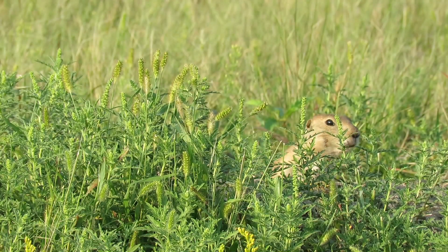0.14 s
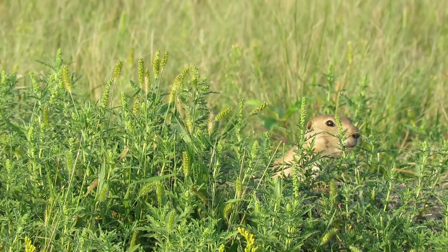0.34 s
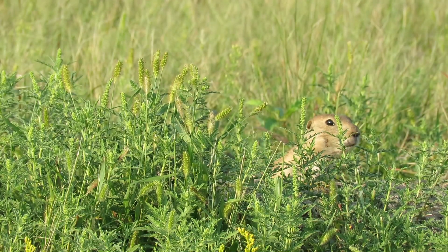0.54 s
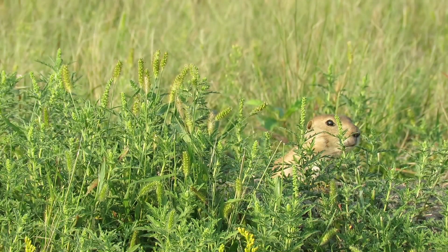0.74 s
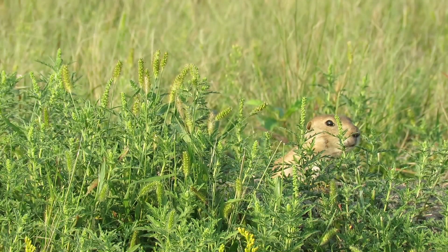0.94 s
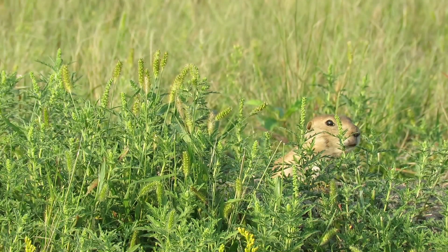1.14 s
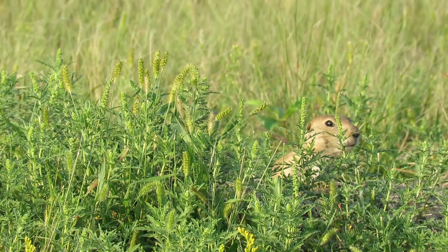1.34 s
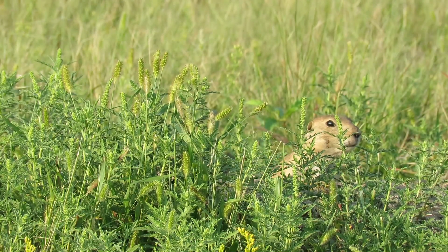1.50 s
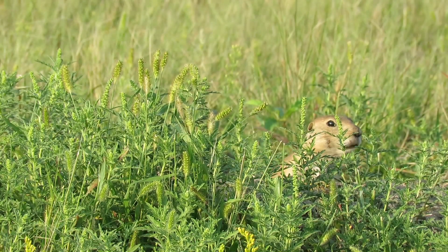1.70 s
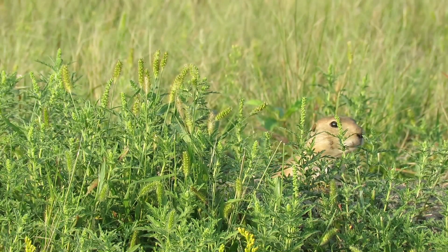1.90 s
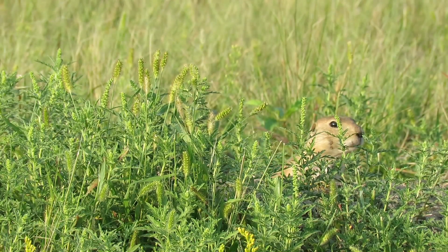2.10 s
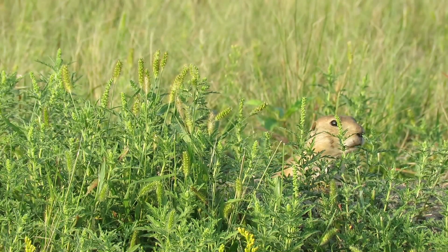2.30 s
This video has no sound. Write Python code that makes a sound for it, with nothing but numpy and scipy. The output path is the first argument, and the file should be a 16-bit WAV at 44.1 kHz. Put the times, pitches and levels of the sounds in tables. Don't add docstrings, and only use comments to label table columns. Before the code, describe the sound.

A prairie dog barks five times, short, high and slightly fluttering, at centre in a grassy field. Crickets chirp and trill around it, and light wind thumps the wide stereo microphone near the end.

```python
import sys
import numpy as np
from scipy import signal
from scipy.fft import rfft, irfft, next_fast_len
from scipy.io import wavfile
from scipy.ndimage import uniform_filter1d, map_coordinates

SR = 44100
rng = np.random.default_rng(int(sys.argv[2]) if len(sys.argv) > 2 else 0)


def put_to_file(sound):
    columns = np.atleast_2d(sound).T
    safe = np.clip(columns, -1, 1)
    whole_steps = np.round(safe * 32767)
    wavfile.write(sys.argv[1], SR, whole_steps.astype(np.int16))


def natural_amplitude(level_db):
    exponent = np.asarray(level_db, float) / 20
    return 10 ** exponent


N = 103635

# time_s, pitch_hz, effort_db, flutter_db (re tone)
BARK_CONTOURS = [
    [(.196, 1820, -59, -18), (.199, 1870, -41, -18), (.203, 2030, -43.5, 3), (.208, 2068, -41.5, -10),
     (.222, 2074, -40.5, -13), (.229, 2087, -46, -1), (.235, 1880, -44, 1), (.243, 1750, -46, -15),
     (.25, 1490, -63, -5)],
    [(.5625, 1775, -71, -24), (.565, 1827, -43, -9), (.573, 1988, -41, -9), (.581, 1985, -37.5, -8),
     (.59, 1958, -44.5, -6), (.6, 1890, -45, -4), (.607, 1786, -41, -14), (.611, 1610, -54, -10),
     (.616, 1410, -59, -12)],
    [(.963, 1740, -76, -10), (.966, 1831, -44, -26), (.974, 1897, -39, -15), (.983, 1907, -40.5, -8.5),
     (.992, 1885, -41, -9), (1.0005, 1846, -41.5, -17), (1.008, 1766, -42, -12), (1.012, 1590, -52, -6),
     (1.019, 1460, -58, -14)],
    [(1.2925, 1730, -56, 2), (1.295, 1714, -51.5, -5), (1.301, 1812, -43, -3.5), (1.308, 1893, -39.5, -25),
     (1.315, 1900, -40.5, -8), (1.324, 1852, -43, -13), (1.331, 1840, -42.5, -18),
     (1.336, 1640, -47.5, -12), (1.341, 1510, -78, -12)],
    [(1.8165, 1575, -57, 2), (1.821, 1623, -53.5, -4), (1.827, 1715, -47, -6), (1.833, 1712, -41.5, -10.5),
     (1.839, 1755, -39.5, -14), (1.848, 1756, -39.5, -21), (1.854, 1715, -42.5, -22),
     (1.857, 1550, -49, -12), (1.866, 1320, -65, -4)],
]
# start_hz, middle_hz, end_hz
FLUTTER_RATES = [(404, 420, 316), (442, 580, 290), (469, 300, 280), (360, 285, 240), (461, 350, 246)]
# freq_hz, gain_db
THROAT_GAIN = [(1450, 0), (1800, 0), (2400, -2), (3000, 10), (3560, 9), (3850, 9), (4150, 18),
               (4700, -16.5)]
# freq_hz, gain_db
MUZZLE_GAIN = [(4700, 1), (6000, 9), (7600, 3.5), (9500, 1), (11500, -4), (13000, -4), (14000, -15),
               (15200, -38)]

# onset_s, level_db, pitch_hz
NEAR_CHIRPS = [(0.0762, -41.5, 4840), (0.1204, -40.5, 4890), (0.1656, -39.5, 4900), (0.949, -38.5, 4840),
               (0.9946, -40, 4890), (1.4626, -38.5, 4833), (1.506, -37.5, 4880), (1.559, -38, 4910),
               (1.9635, -38, 4815), (2.0058, -37, 4880), (2.055, -36.5, 4910)]
# onset_s, level_db, pitch_hz
RIGHT_CHIRPS = [(0.3561, -46, 4760), (0.401, -48.5, 4670), (0.783, -53, 4700), (0.82, -50, 4640),
                (0.8614, -53, 4700), (1.2216, -51, 4740), (1.2644, -47.5, 4690), (1.6123, -49.5, 4720),
                (1.6657, -49.5, 4700), (2.1083, -44.5, 4700), (2.154, -47, 4700)]
# onset_s, level_db, pitch_hz
LOW_CHIRPS = [(1.075, -56, 4170), (1.122, -54.5, 4250), (1.41, -60, 4180), (1.455, -58, 4230),
              (1.91, -53, 4230), (2.222, -62, 4100), (2.265, -55.5, 4130), (2.315, -54, 4200)]
# onset_s, level_db, pitch_hz
CENTRE_CHIRPS = [(0.7944, -63, 5000), (0.836, -63, 5140), (1.1423, -61, 5000), (1.1844, -52, 4890),
                 (1.6444, -52, 4960), (1.6866, -57, 5000), (2.0344, -50, 4960), (2.0794, -60, 4970),
                 (2.1166, -57, 5000), (2.2443, -56, 5000), (2.2827, -59, 4970), (2.3306, -53.5, 4860)]
# start_s, period_s, stroke_count
TRILL_PHRASES = [
    (-.011, .0609, 21),
    (1.276, .06, 1),
    (1.455, .0578, 5),
    (1.748, .0593, 11),
]
# start_s, period_s, stroke_count
ANSWER_PHRASES = [
    (.024, .0587, 12),
    (1.059, .056, 5),
    (1.359, .0587, 16),
]
# centre_after_onset_s, length_s, start_pitch_drop_share, end_pitch_drop_share
FIELD_WING = (.006, .025, .01, .12)
TRILL_WING = (.008, .029, .04, .17)
ANSWER_WING = (0.026, 0.022, 0.016, 0.028)

# end_s, level_db
KATYDID_RASPS = [
    (.026, -63),
    (.068, -61),
    (.115, -58),
    (0.162, -61),
]
# freq_hz, density_db_per_hz
RASP_SPECTRUM = [(8800, -35), (9300, 3), (9940, 12), (11900, -16), (13500, -8), (14800, -19), (15500, -17)]
# freq_hz, density_db_per_hz
AIR_SPECTRA = [
    [(8900, -40), (9300, -6), (10500, 0), (12000, 1), (13500, -2), (15500, -5)],
    [(8900, -40), (9300, -10), (10300, -10), (11500, -2), (12500, 0), (15500, -5)],
]

# freq_hz, density_db_per_hz
HUM_MID = [(70, -17), (130, -3.5), (290, 1), (1000, -5), (1500, -8.5), (3110, -13.5), (8700, -21.5),
           (9000, -52)]
# freq_hz, density_db_per_hz
HUM_SIDE = [(60, -33), (110, -5.5), (380, 2), (600, -5), (1500, -13.5), (3770, -22.5), (8800, -38),
            (9050, -52)]
# centre_hz, spread_hz, mid_db, side_db
CHORUS_BANDS = [
    (4620, 346, -61, -67.5),
    (7695, 450, -61, -61),
]

# time_s, level_db
BUFFET_LEVEL = [
    (0, -60),
    (.4, -70.5),
    (.6, -60),
    (1.1, -65.5),
    (1.6, -55.5),
    (2.35, -61),
]
# freq_hz, density_db_per_hz
RUMBLE_SPECTRUM = [(12, -23), (20, -23), (46, 0), (65, -7.5), (119, -15.5), (150, -23.5), (260, -28),
                   (340, -51), (570, -120)]
# start_s, peak_db
WIND_PUFFS = [(0.599, -65), (0.874, -61), (1.269, -58), (1.382, -54.5), (1.587, -54.5), (1.699, -53),
              (1.766, -55.5), (1.87, -53.5), (1.916, -50.5), (1.959, -62), (2.08, -43), (2.113, -43),
              (2.169, -47.5), (2.226, -51.5), (2.289, -53.5)]
# centre_s, peak_db, rate_hz
WHIRLS = [(.884, -46, 78), (1.391, -45, 83), (1.688, -42, 74.5), (1.759, -42, 60), (1.874, -41, 70),
          (1.921, -39, 75), (2.075, -21.5, 106), (2.092, -28, 90), (2.121, -34, 80), (2.178, -37, 60),
          (2.22, -39.5, 59), (2.242, -36.5, 58)]
# line_hz, level_db
MACHINE_LINES = [
    (290, -75),
    (549, -71.5),
    (740, -72),
    (990, -74),
]


def unit(x):
    return x / np.sqrt(np.mean(np.abs(x) ** 2) + 1e-20)


def along(points, hz):
    f, v = np.transpose(points)
    return np.interp(np.log(np.abs(hz) + 1), np.log(f + 1), v)


def wobble(rate_hz, size=N):
    knots = rng.standard_normal(int(size * rate_hz / SR) + 4)
    return map_coordinates(knots, [np.arange(size) * rate_hz / SR])


def filtered(x, response):
    m = next_fast_len(x.shape[-1] + SR // 4)
    spectrum = rfft(x, m) * response(np.fft.rfftfreq(m, 1 / SR))
    return irfft(spectrum, m)[..., :x.shape[-1]]


def hiss(gain, patchy_db):
    z = signal.stft(rng.standard_normal(N + 512), nperseg=256)[2]
    patches = uniform_filter1d(rng.standard_normal(z.shape), 3, 0)
    patches = uniform_filter1d(patches, 6, 1)
    noise = signal.istft(z * natural_amplitude(patchy_db * unit(patches)), nperseg=256)[1][:N]
    return unit(filtered(noise, gain))


def place(z, lead_rad, left_db):
    left = z * np.exp(.5j * lead_rad) * natural_amplitude(left_db / 2)
    right = z * np.exp(-.5j * lead_rad) * natural_amplitude(-left_db / 2)
    return np.real([left, right])


def tract_db(hz):
    return along(THROAT_GAIN, hz) + along(MUZZLE_GAIN, hz)


def bark(rows, flutter_hz):
    jitter_hz, flutter_wander, flutter_trim_db = 11.5, .12, -1
    lower_db, second_db, breath_db = -11, -9, -7
    shimmer_db, fray_db, soft_tilt = 2, .6, .25
    s, *cols = np.transpose(rows)
    t = np.arange(s[0], s[-1], 1 / SR)
    size = len(t)
    hz, effort_db, flutter_db = [np.interp(t, s, c) for c in cols]
    hz = uniform_filter1d(hz, 200, mode="nearest") + jitter_hz * wobble(550, size)
    flutter = np.interp(t, np.linspace(s[0], s[-1], len(flutter_hz)), flutter_hz)
    flutter = flutter * (1 + flutter_wander * wobble(122.5, size))
    turn, beat = 2 * np.pi * np.cumsum([hz, flutter], axis=1) / SR
    depth_db = flutter_db + flutter_trim_db + 3 * wobble(188, size)
    sidebands = [(0, 0), (1, depth_db), (-1, depth_db + lower_db),
                 (2, depth_db + second_db), (-2, depth_db + lower_db + second_db)]
    tone = np.zeros(size)
    for k in range(1, 9):
        tilt_db = soft_tilt * max(k - 2, 0) * (effort_db - effort_db.max())
        for j, db in sidebands:
            level_db = db - 2.4 * (k == 1 and j != 0) + tilt_db + tract_db(k * hz + j * flutter)
            level_db = level_db + (shimmer_db + fray_db * (k - 3.5)) * wobble(530, size)
            tone += natural_amplitude(level_db) * np.sin(k * turn + j * beat + k * k)

    def breath_gain(f):
        return natural_amplitude(0.55 * tract_db(f)) / (1 + (3200 / (f + 1)) ** 4) / (1 + (f / 13800) ** 30)

    breath = unit(filtered(rng.standard_normal(size) * (1 + np.cos(turn)), breath_gain))
    return natural_amplitude(effort_db) * (np.sqrt(2) * tone + natural_amplitude(breath_db) * breath)


def barks():
    echo_db, t60_s = -23, 0.034
    out = np.zeros(N)
    for rows, flutter_hz in zip(BARK_CONTOURS, FLUTTER_RATES):
        call = bark(rows, flutter_hz)
        out[round(rows[0][0] * SR):][:len(call)] += call
    t = np.arange(SR // 8) / SR
    tail = rng.standard_normal((2, len(t))) * natural_amplitude(-60 * t / t60_s)
    tail = tail / np.linalg.norm(tail[0])
    return out + natural_amplitude(echo_db) * signal.fftconvolve(out[None], tail, axes=1)[:, :N]


def strokes(rows, wing, octave_db=-60, peak=0.32, sharp=1.16):
    centre_s, length_s, rise, fall = wing
    out = np.zeros(N + SR, complex)
    u = np.linspace(0, 1, int(length_s * SR))
    bend = 1 - rise * np.clip(1 - u / peak, 0, 1) ** 2
    bend = bend - fall * np.clip((u - peak) / (1 - peak), 0, 1) ** 2
    swell = np.sin(np.pi * u ** (np.log(.5) / np.log(peak))) ** sharp
    for s, db, hz in rows:
        turn = 2 * np.pi * (np.cumsum(hz * bend) / SR + rng.random())
        wave = np.exp(1j * turn) + natural_amplitude(octave_db) * np.exp(2j * turn)
        first = round((s + centre_s - peak * length_s) * SR) + SR // 2
        out[first:][:len(u)] += natural_amplitude(db) * swell * wave
    return out[SR // 2:][:N]


def trill(phrases, hz, db):
    rows = np.array([(s + k * period_s, db, hz) for s, period_s, count in phrases for k in range(int(count))])
    return rows + rng.standard_normal(rows.shape) * [.001, 1, 25]


def crickets():
    high = strokes(trill(TRILL_PHRASES, hz=8072, db=-46.5), TRILL_WING, sharp=.6)
    answer = strokes(trill(ANSWER_PHRASES, hz=7940, db=-55), ANSWER_WING)
    return (place(strokes(NEAR_CHIRPS, FIELD_WING, octave_db=-30.5), lead_rad=0.9, left_db=2.0)
            + place(strokes(RIGHT_CHIRPS, FIELD_WING), lead_rad=-1.06, left_db=-2.5)
            + place(strokes(LOW_CHIRPS, FIELD_WING), lead_rad=0.92, left_db=3.0)
            + place(strokes(CENTRE_CHIRPS, FIELD_WING), lead_rad=.3, left_db=-1.0)
            + place(high, lead_rad=2.15, left_db=1.1)
            + place(answer, lead_rad=2.4, left_db=1.0))


def rustle():
    rasp_s, between_db = 0.022, -7.5
    t = np.arange(N) / SR
    gate = np.zeros(N)
    for end_s, db in KATYDID_RASPS:
        gate += natural_amplitude(db) * np.clip(1 - (end_s - t) / rasp_s, 0, 1) ** 0.6 * (t < end_s)
    gate += natural_amplitude(KATYDID_RASPS[0][1] + between_db) * (t < .19)
    gate = uniform_filter1d(gate, 130)

    def layer(air, air_db, rasp_db, air_patchy_db):
        rasp = hiss(lambda f: natural_amplitude(along(RASP_SPECTRUM, f)), patchy_db=2.0)
        high_air = hiss(lambda f: natural_amplitude(along(air, f)), patchy_db=air_patchy_db)
        return gate * natural_amplitude(rasp_db) * rasp + natural_amplitude(air_db) * high_air

    mid = layer(AIR_SPECTRA[0], air_db=-78.5, rasp_db=-8, air_patchy_db=3)
    side = layer(AIR_SPECTRA[1], air_db=-71.5, rasp_db=0, air_patchy_db=1.5)
    return np.array([mid + side, mid - side])


def far_strokes():
    count, level_db, pitch_hz, spread_hz = 56, -54.5, 4605, 200
    draw = rng.standard_normal((count, 3))
    s = np.clip((np.arange(count) + .5 * draw[:, 0]) * N / SR / count, 0, N / SR)
    return np.transpose([s, level_db + 2.4 * draw[:, 1], pitch_hz + spread_hz * draw[:, 2]])


def distant_crickets():
    far = far_strokes()
    return (place(strokes(far[::2], FIELD_WING), lead_rad=0.98, left_db=4.5)
            + place(strokes(far[1::2], FIELD_WING), lead_rad=-0.57, left_db=2.0))


def field():
    mid = natural_amplitude(-58.5) * hiss(lambda f: natural_amplitude(along(HUM_MID, f)), patchy_db=1.9)
    side = natural_amplitude(-51.5) * hiss(lambda f: natural_amplitude(along(HUM_SIDE, f)), patchy_db=1.2)
    for hz, spread_hz, mid_db, side_db in CHORUS_BANDS:
        def band(f):
            return np.exp(-.5 * ((f - hz) / spread_hz) ** 2)
        mid = mid + natural_amplitude(mid_db) * hiss(band, patchy_db=4.0)
        side = side + natural_amplitude(side_db) * hiss(band, patchy_db=-3.0)
    return np.array([mid + side, mid - side])


def wind():
    puff_rise_s, puff_db = 0.011, 7.5
    s, db = np.transpose(BUFFET_LEVEL)
    t = np.arange(N) / SR
    level = natural_amplitude(np.interp(t, s, db))
    for start_s, peak_db in WIND_PUFFS:
        u = np.clip(t - start_s, 0, None) / puff_rise_s
        level = level + natural_amplitude(peak_db + puff_db) * (u * np.exp(1 - u)) ** 2

    def rumble():
        return signal.hilbert(hiss(lambda f: natural_amplitude(along(RUMBLE_SPECTRUM, f)), patchy_db=-2.5))

    shared, own = rumble(), rumble()
    even = unit(shared / (np.abs(shared) + 0.33))
    ports = place(even, lead_rad=.8, left_db=-4) + .15 * place(own, lead_rad=np.pi, left_db=0)
    return filtered(level * ports, lambda f: 1 / (1 + (f / 170) ** 6) / (1 + (35 / (f + 1)) ** 4))


def eddies():
    lag_s, left_db, left_faster, width_cycles = .003, -2, 1.115, 0.41
    t = np.arange(N) / SR

    def whirl(u):
        return np.sin(2 * np.pi * u) * np.exp(-.5 * (u / width_cycles) ** 2)

    out = np.zeros((2, N))
    for s, db, hz in WHIRLS:
        left = natural_amplitude(left_db) * whirl((t - s) * hz * left_faster)
        right = whirl((t - s - lag_s) * hz)
        out += natural_amplitude(db) * np.array([left, right])
    return out


def drone():
    wander_hz = 11.9
    out = np.zeros(N)
    for hz, db in MACHINE_LINES:
        level = np.sqrt(2) * natural_amplitude(db + 1.5 * wobble(8.34))
        out += level * np.sin(2 * np.pi * np.cumsum(hz + wander_hz * wobble(30)) / SR)
    return out


def scene():
    return barks() + crickets() + rustle() + distant_crickets() + field() + wind() + eddies() + drone()


def top_cut(x):
    return signal.sosfilt(signal.butter(12, 15630, fs=SR, output="sos"), x)


def record(dry):
    return top_cut(dry)


dry = scene()
out = record(dry)
put_to_file(out)
```